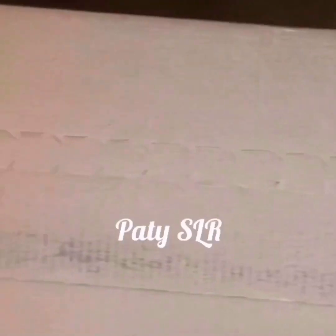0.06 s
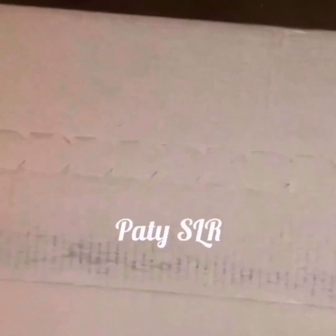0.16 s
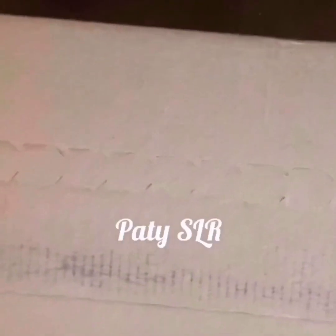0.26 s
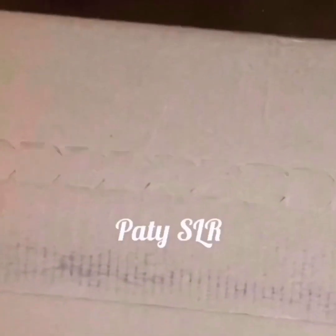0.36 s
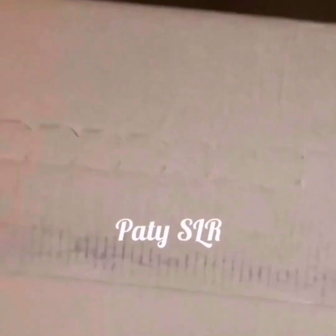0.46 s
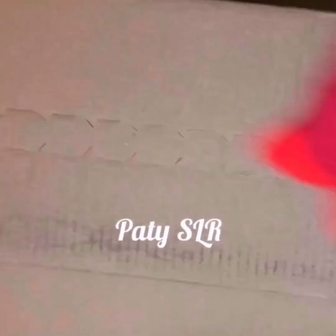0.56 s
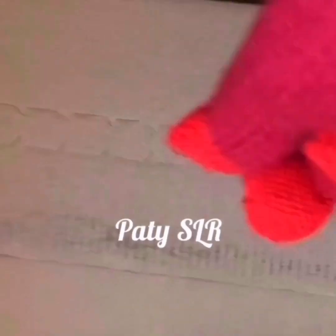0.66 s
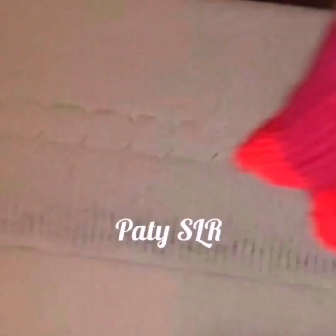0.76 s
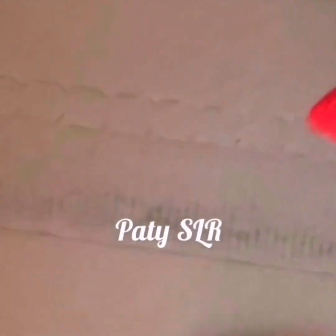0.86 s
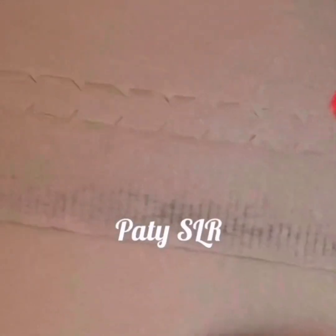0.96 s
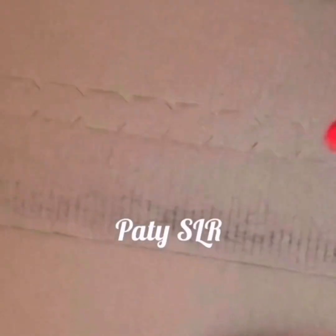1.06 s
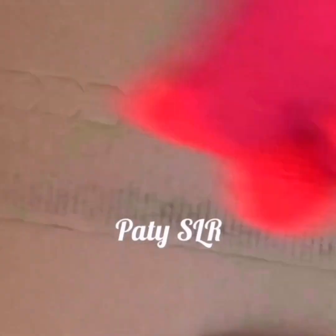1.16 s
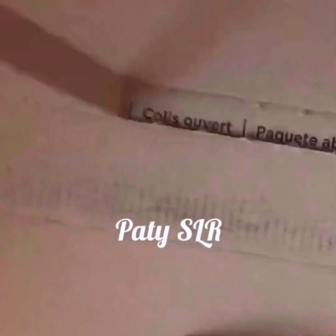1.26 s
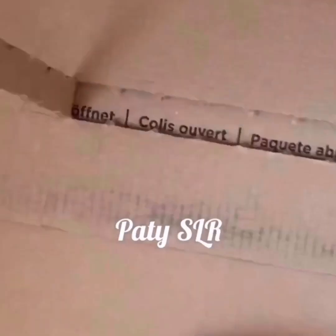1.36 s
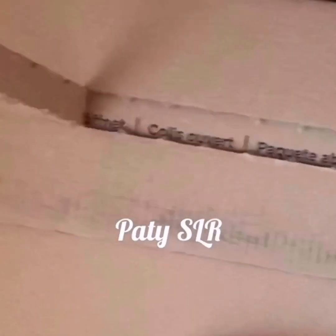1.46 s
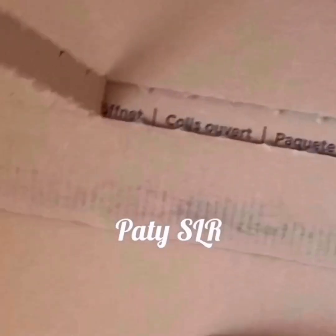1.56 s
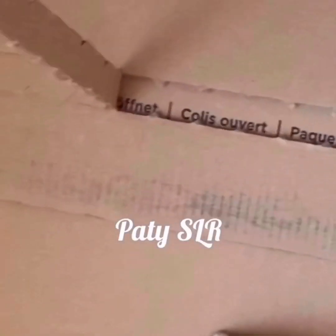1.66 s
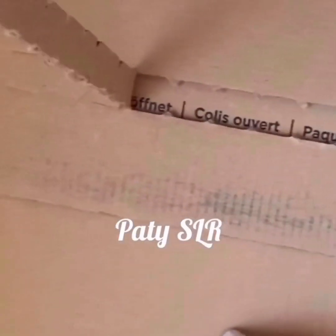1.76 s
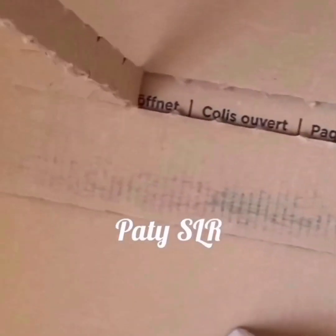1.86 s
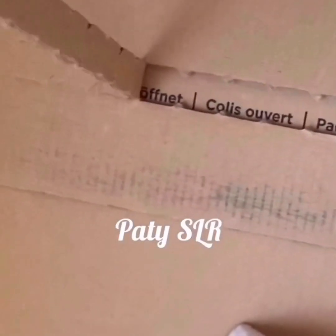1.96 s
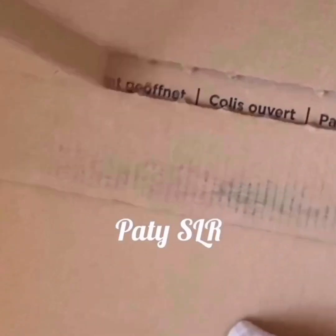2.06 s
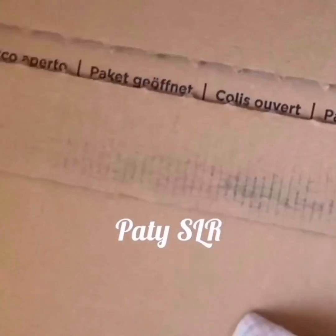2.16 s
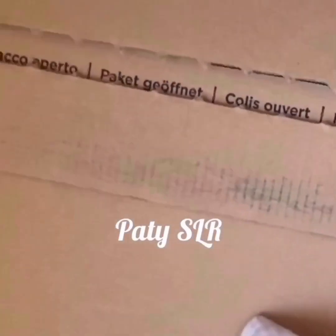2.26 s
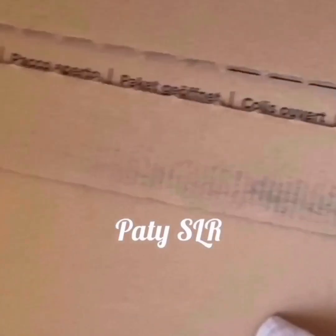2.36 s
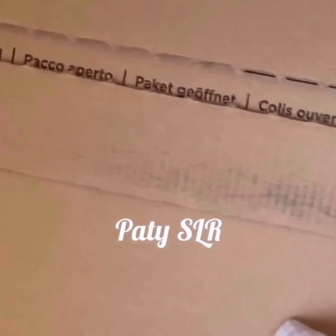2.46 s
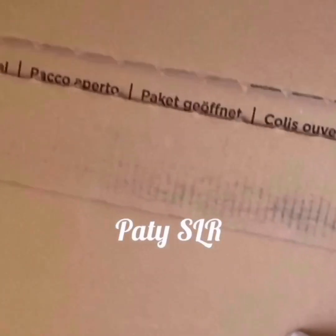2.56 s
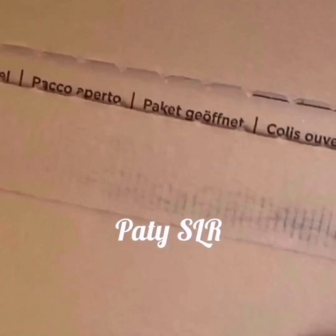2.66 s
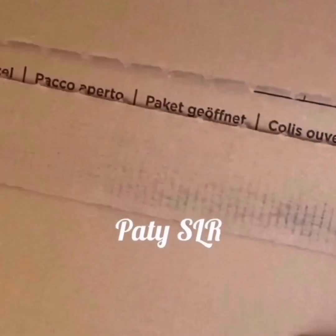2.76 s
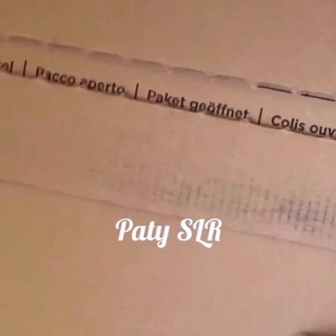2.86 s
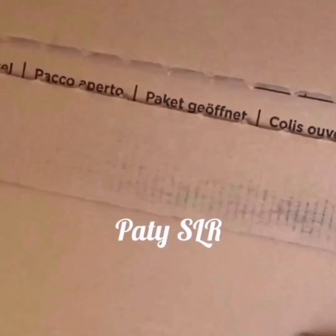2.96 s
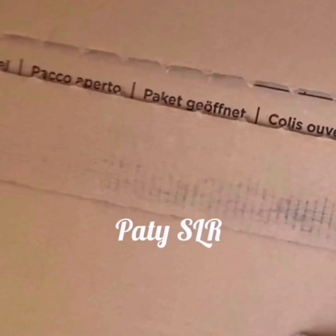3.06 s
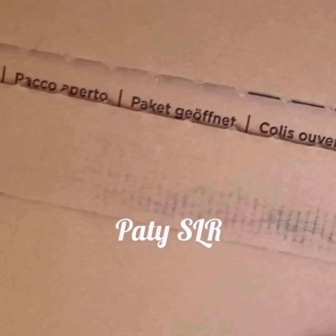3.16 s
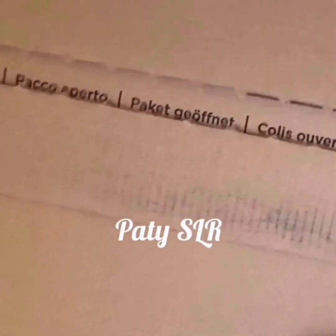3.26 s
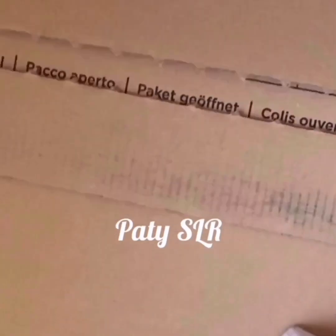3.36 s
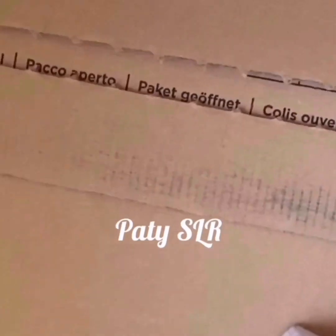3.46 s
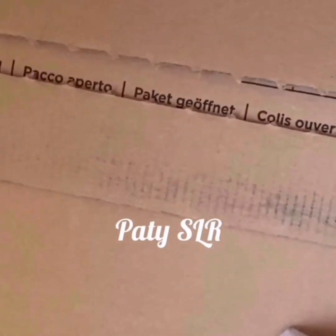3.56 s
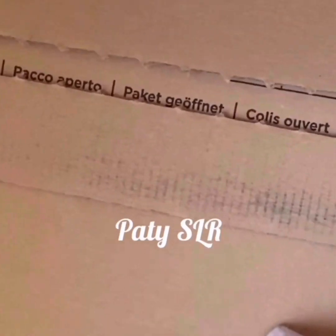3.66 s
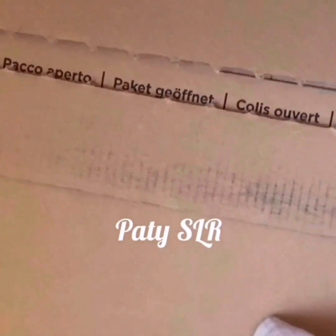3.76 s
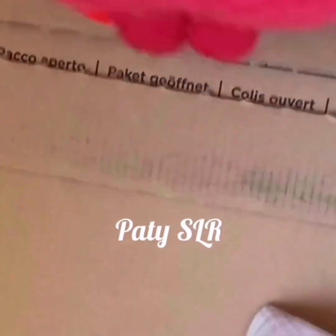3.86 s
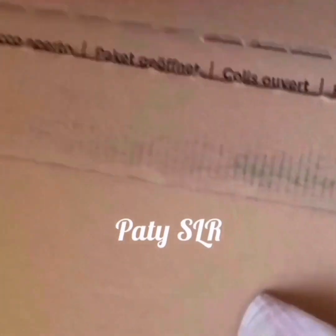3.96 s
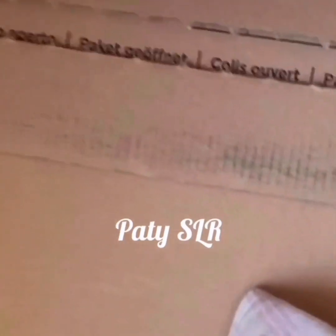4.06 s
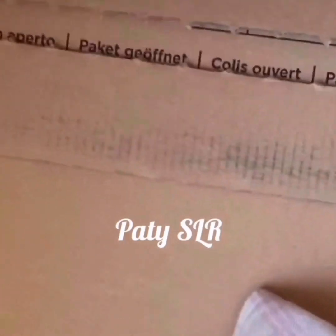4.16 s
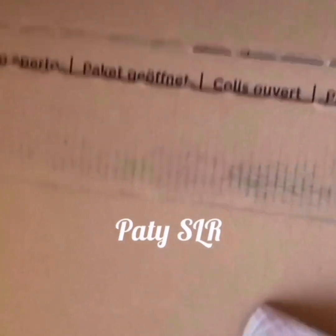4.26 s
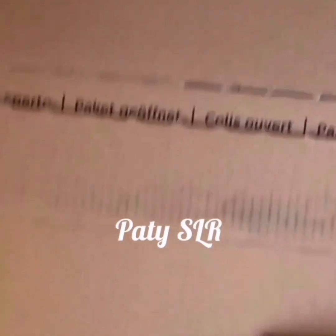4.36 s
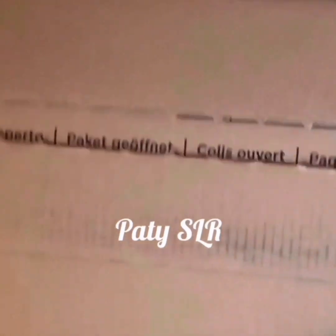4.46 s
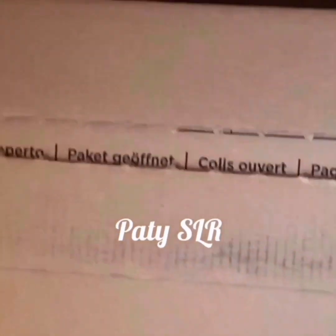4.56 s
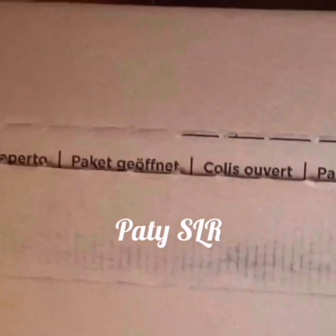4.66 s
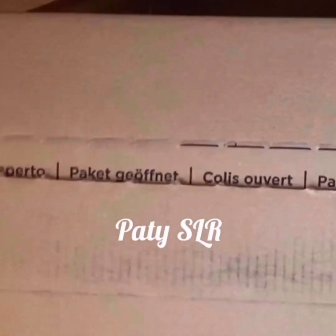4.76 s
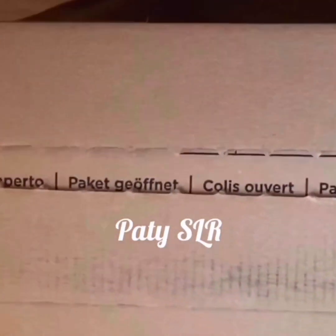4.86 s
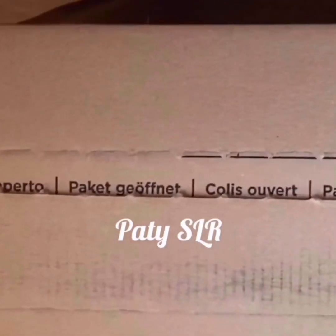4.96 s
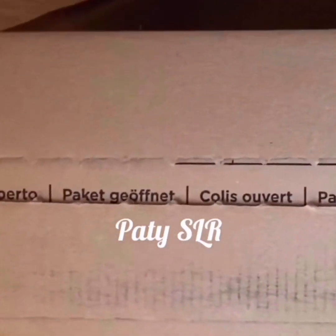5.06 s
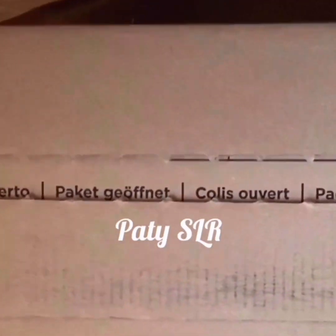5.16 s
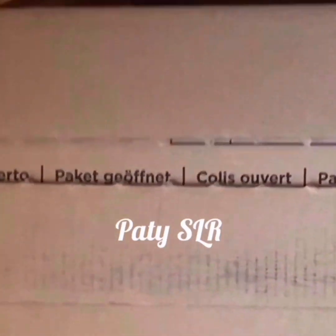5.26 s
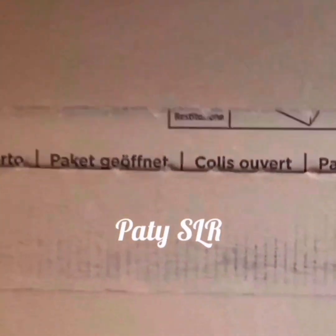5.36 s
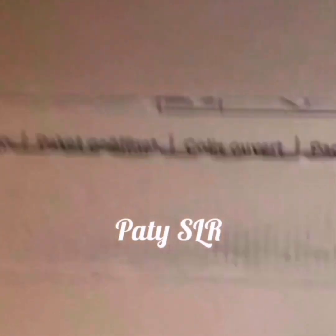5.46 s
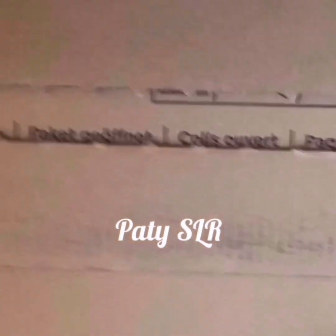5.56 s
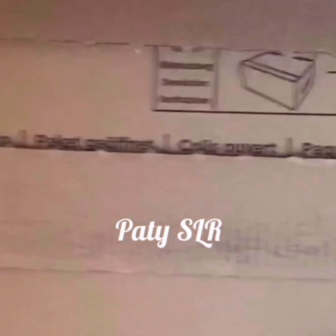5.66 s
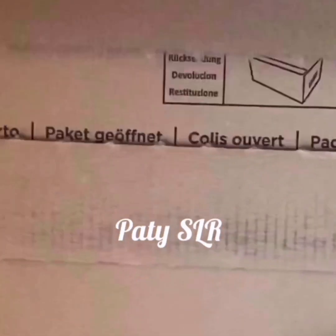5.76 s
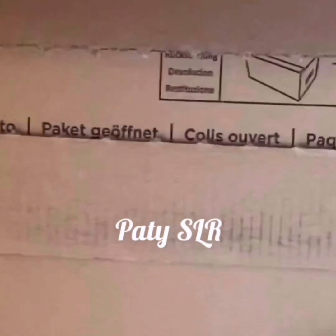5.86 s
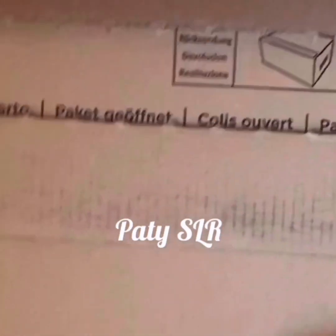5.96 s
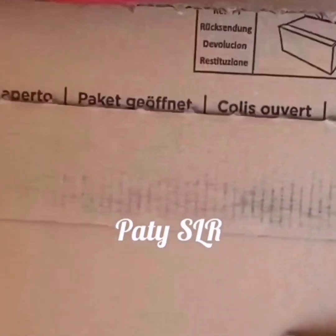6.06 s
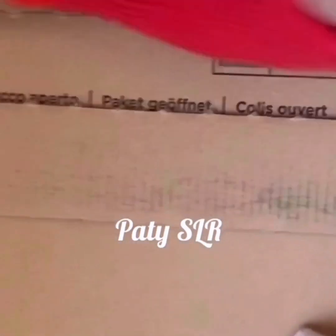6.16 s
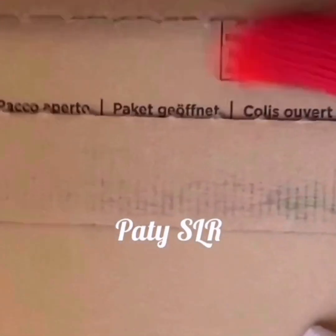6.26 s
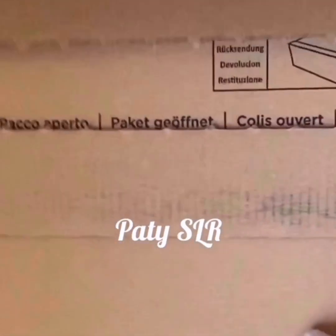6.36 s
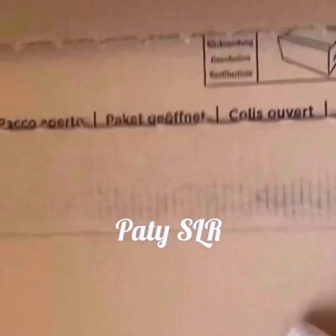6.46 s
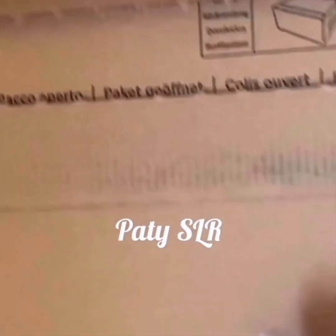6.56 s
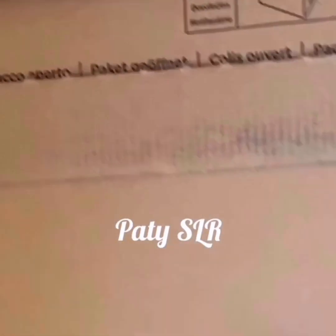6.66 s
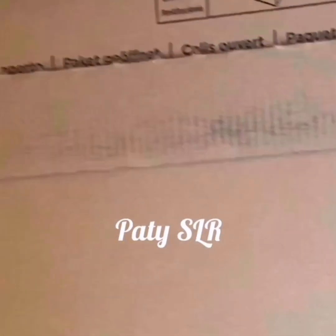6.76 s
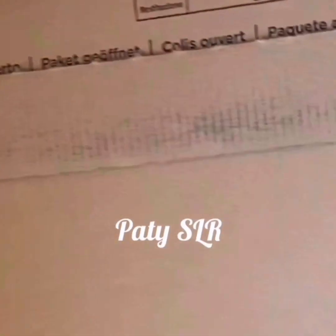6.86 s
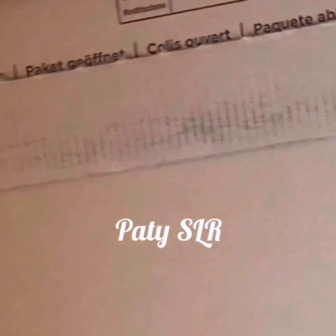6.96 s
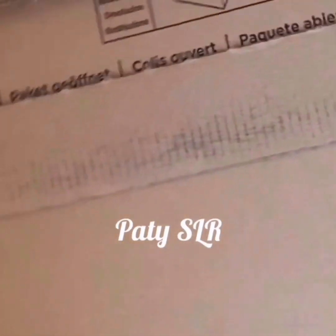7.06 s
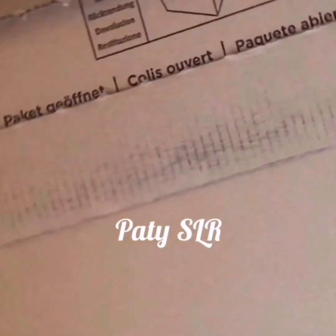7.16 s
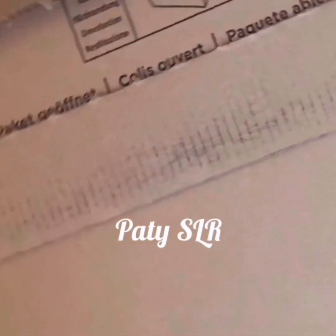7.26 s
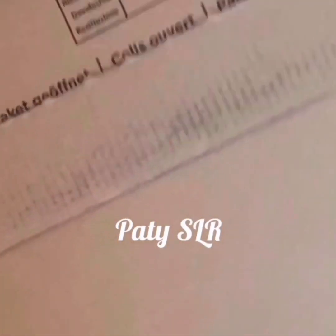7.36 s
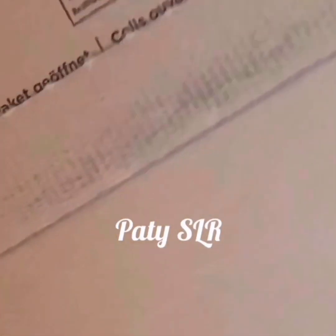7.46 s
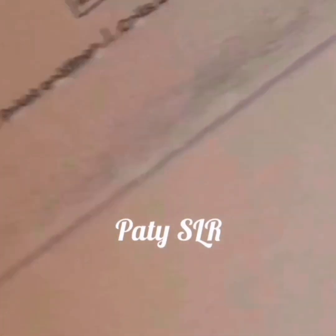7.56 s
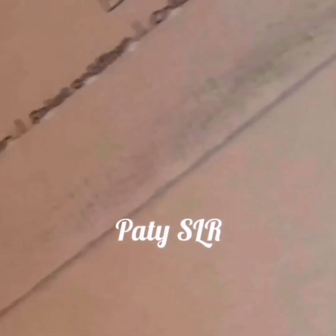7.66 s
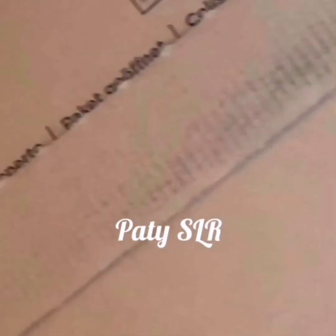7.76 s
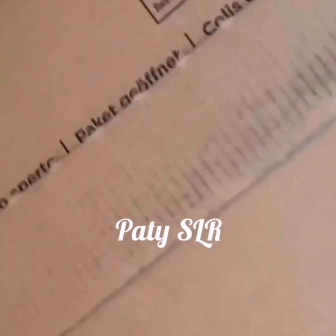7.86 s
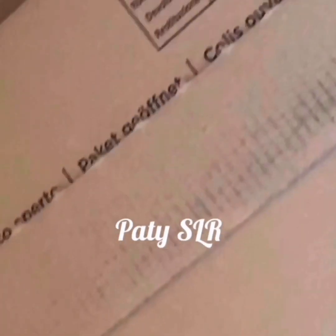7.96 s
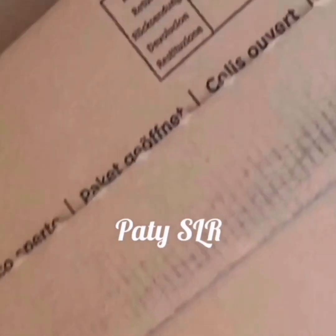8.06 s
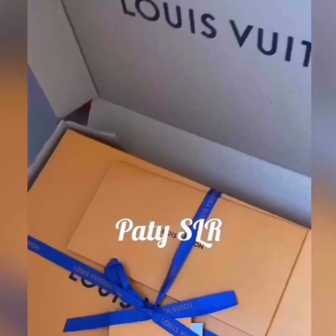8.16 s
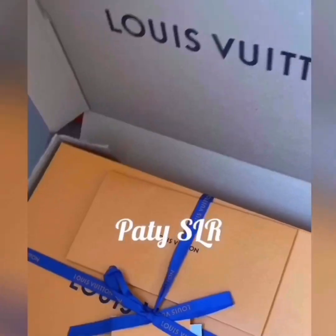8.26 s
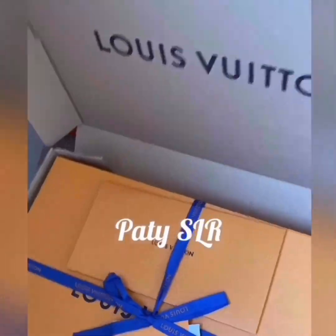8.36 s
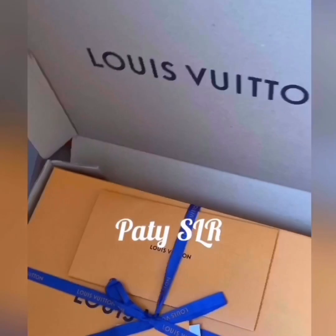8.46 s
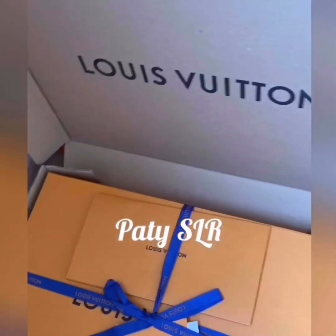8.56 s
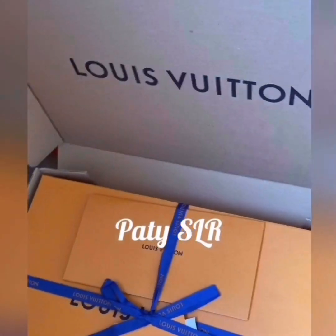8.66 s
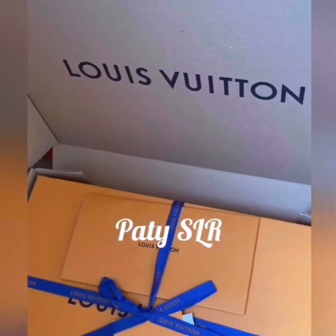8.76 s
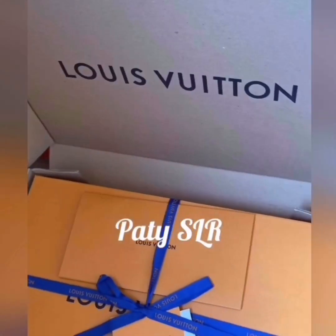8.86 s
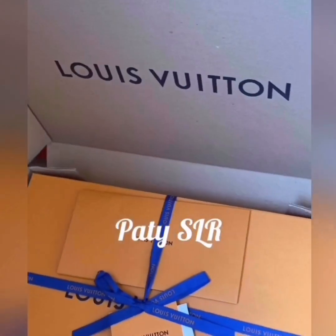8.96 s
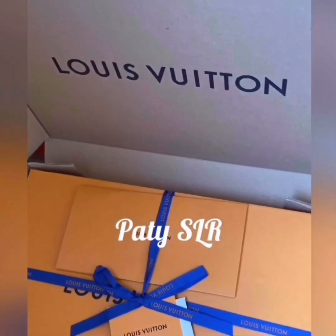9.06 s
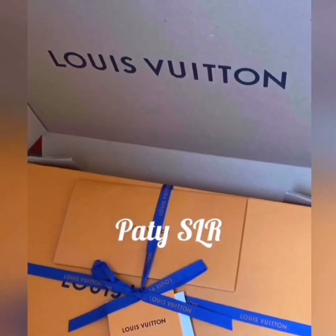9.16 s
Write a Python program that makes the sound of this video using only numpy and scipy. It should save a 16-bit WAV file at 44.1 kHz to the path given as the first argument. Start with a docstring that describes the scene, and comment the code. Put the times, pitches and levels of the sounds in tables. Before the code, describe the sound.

A cardboard tear strip rips open in short, loud, crackling bursts close up, then hands slide and knock softly on the hollow box.

```python
"""Cardboard tear strip

A tear strip is ripped open in short pulls, close to two microphones in a small room. Each pull bursts
a run of paper bridges: clusters of noise cracks that kick the box's decaying modes, while liner peels.
Hands slide over the card as shaped crack noise, a few last bridges give way, creases tick as short
bursts, panels buckle and flaps knock as swept or ringing sines, over a quiet noise rumble."""
import sys
import numpy as np
from scipy import signal
from scipy.fft import rfft, irfft
from scipy.io import wavfile

SR = 44100
rng = np.random.default_rng(int(sys.argv[2]) if len(sys.argv) > 2 else 0)


def log_audio(samples):
    """Write samples as a 16-bit WAV file to the path given in sys.argv[1]."""
    # one column per channel
    frames = np.atleast_2d(samples).T
    # limit to full scale, then quantise
    limited = np.clip(frames, -1, 1)
    pcm = np.round(limited * 32767).astype(np.int16)
    wavfile.write(sys.argv[1], SR, pcm)


N = 405478
TIME = np.arange(N) / SR
BURST_LEAD_S = 2048 / SR  # a burst sits in the middle of its window

# pulls on the strip, each bursting a run of evenly spaced paper bridges:
# start_s, bridge_count, gap_ms, first_level_db, change_per_bridge_db, treble_lift_db, box_kick_db
PULLS = [(0.195, 3, 36.5, -13.5, 1, -3.5, -18.5), (0.290, 4, 22.6, -12.5, -1.02, -4.5, -17),
         (0.8971, 4, 20.5, -11, 1, -0.5, -15), (0.979, 3, 21.3, -14.5, 1, -4.5, -24.5),
         (1.059, 2, 6.5, -18.5, 1, -1.5, -26.5), (1.836, 2, 8.6, -16, 3, -4.5, -25),
         (1.867, 5, 20.5, -10.5, -0.65, -0.5, -17.5), (1.978, 2, 13, -14, -4.5, 2.5, -30.5),
         (2.019, 2, 7, -19, 5.5, -1, -27), (2.362, 2, 21, -16.5, 2, 3.5, -33),
         (2.513, 2, 15.7, -17, 2, 0, -21), (5.063, 3, 4.5, -21, 2, -3.5, -39),
         (5.1315, 1, 20, -21.5, 0, -7, -36), (5.336, 2, 17.5, -28, 7, 3.5, -23.5),
         (5.412, 1, 18, -20, 0, 28, -50)]
# dry ticks: mostly creases as the card bends, plus lone cracks of the strip just before, within or after a
# pull: start_s, level_db, treble_lift_db
CREASES = [(0.083, -46.5, -7.5), (0.170, -24, -0.5), (0.481, -35.5, 18.5), (0.77, -48, 15),
           (0.813, -35, 7.5), (0.872, -27.5, -1), (1.087, -23.5, -10.5), (1.725, -30, 11.5),
           (1.904, -13.5, 6), (2.221, -44.5, -8), (2.302, -50, 9), (2.926, -38, 34), (3.284, -51, 19),
           (4.187, -51.5, -5.5), (4.302, -49, -4), (4.337, -48, 0), (4.372, -46, -5.5), (4.626, -43.5, 7),
           (4.671, -39.5, -9), (4.751, -41.5, -5.5), (4.924, -41, -4), (5.303, -36.5, 6), (5.562, -50, 17),
           (5.646, -44, -8), (5.734, -46.5, -7), (6.021, -36.5, 15), (6.308, -41.5, -15), (6.746, -44, -3),
           (6.894, -52, -5), (7.005, -57.5, -5.5), (7.2, -37, -3.5), (7.438, -43, -4), (7.979, -38.5, -5.5)]
# strokes of hand or card over the box:
# start_s, length_s, grain_hiss_db, panel_scrape_db, swell_db (over the stroke)
STROKES = [(1.687, 0.073, -58, -62.5, 14), (2.424, 0.012, -36, -40.5, 1), (2.876, 0.055, -53, -56.5, 1.5),
           (3.083, 0.16, -63, -60, -5.5), (3.496, 0.1, -75.5, -90, -9), (4.345, 0.17, -65.5, -70, -14.5),
           (4.539, 0.059, -59, -83, 3), (4.743, 0.29, -56.5, -60, 10.5), (5.005, 0.049, -45, -60, 14),
           (5.093, 0.082, -39.5, -44, -11), (5.178, 0.19, -52, -56.5, -10),
           (5.327, 0.25, -49.5, -52.5, -11), (5.563, 0.11, -49.5, -48, -10),
           (5.653, 0.43, -63.5, -64.5, -5.5), (6.154, 0.23, -56.5, -56, 10.5),
           (6.36, 0.3, -59.5, -62, 10.5), (6.721, 0.025, -55, -57, -2.5), (6.867, 0.4, -69.5, -65.5, -0.5),
           (7.218, 0.37, -53.5, -53.5, -3), (7.665, 0.059, -60, -51, -3), (7.776, 0.22, -66, -58, -6.5),
           (8.416, 0.1, -74, -77, -1), (8.801, .38, -71.5, -72.5, 11)]
# a cut edge rasping over the card: start_s, length_s, level_db, resonance_hz
RASPS = [(6.573, 0.11, -55.5, 2340), (6.72, 0.028, -44, 2350), (7.208, 0.28, -53.5, 814),
         (7.518, 0.078, -54, 1060), (7.657, 0.045, -44, 2000), (7.661, 0.051, -46.5, 1065),
         (7.8, 0.05, -56.5, 1100)]
# panels giving way under the pull or a hand: start_s, level_db, pitch_hz
BUCKLES = [(0.898, -15.5, 128.4), (0.912, -18, 203), (0.933, -13, 104.7), (1.003, -15.5, 179.6),
           (1.04, -20.5, 157), (1.086, -25.5, 152), (1.882, -17, 166), (1.901, -15.5, 294),
           (2.385, -24.5, 96), (5.614, -34.5, 98), (6.445, -46, 275), (7.428, -44.5, 105),
           (7.535, -31, 273), (7.66, -33.5, 253), (7.83, -45, 268)]
# flaps and fingers knocking on the box: start_s, level_db, contact_ms, flap_pitch_hz (at the onset)
KNOCKS = [(2.527, -19, 3.3, 341), (3.191, -41, 0.64, 492), (5.332, -29, 0.71, 856),
          (5.353, -17.5, 0.38, 739), (5.409, -23, 0.29, 680), (5.762, -40, 0.79, 630),
          (6.344, -28, 0.06, 560), (7.283, -29.5, 1.3, 435), (7.603, -45, 1.1, 373),
          (8.203, -34.5, 0.75, 330)]
# modes of the hollow box and its panels, before each blow detunes them: pitch_hz, level_db
BOX_MODES = [(45, -15), (74, -7), (101, -2), (128, 0.5), (158, 2.5), (195, -1), (280, 1), (545, 2)]
# a sleeve passing by and jostling the box: time_s, rumble_db
SLEEVE = [(1.24, -68), (1.35, -42.5), (1.52, -50), (1.9, -73), (8.08, -81), (8.15, -56.5), (8.37, -59),
          (8.5, -73.5), (9.03, -76.5), (9.12, -66)]

# spectra, as curves through these points: frequency_hz, level_db
FIBRE_COLOUR = [(100, -20), (350, 1), (650, 2), (1000, 2), (1250, -3), (2000, 2), (4500, 1.5), (10500, -1),
                (16500, -2)]  # tearing bridges
LINER_COLOUR = [(100, -8.5), (240, 12), (400, 2), (1000, 1.5), (1300, -2.5), (16500, -10)]  # peeling paper liner
CREASE_COLOUR = [(100, -17.5), (500, 0), (3800, -1.5), (7000, -2), (16500, -2.5)]  # dry ticks
HISS_COLOUR = [(1200, -18), (3000, 0), (14000, 1), (16500, -7)]  # rubbed paper grain
SCRAPE_COLOUR = [(60, -3), (130, 5), (280, 2), (550, 1), (1300, -14), (5000, -36.5)]  # panels answering a stroke
RASP_COLOUR = [(500, -15.5), (800, -2), (1350, -2.5), (2400, -0.5), (3600, -10), (8000, -20.5)]  # cut edges and scuffs
RUMBLE_COLOUR = [(20, -18.5), (50, 9.5), (100, -3), (800, -62)]  # air booming in the box
AIR_COLOUR = [(20, -13.5), (70, -1.5), (9570, -42), (14000, -38)]  # the room
PORT_COLOUR = [(7000, 0), (8400, -1.5), (11200, 3.5), (12000, -15.5), (13200, 5), (16500, -1.5)]  # microphone port, with a notch and a peak in the top octave


def undb(db):
    """Turn decibels into a gain."""
    return 10 ** (np.asarray(db) / 20)


def unit(x):
    """Scale to an energy of one."""
    return x / np.sqrt(np.sum(x ** 2, axis=-1, keepdims=True))


def convolve(x, response):
    """Play a sound through a response, channel by channel."""
    return signal.fftconvolve(np.atleast_2d(x), np.atleast_2d(response), axes=-1)[:, :N]


def add(track, start_s, sound):
    """Mix a sound into a track."""
    i = max(int(start_s * SR), 0)
    track[..., i:i + sound.shape[-1]] += sound[..., :N - i]


def colour(points, size=4096):
    """Causal (minimum-phase) response of unit energy with the given spectrum."""
    hz, db = np.transpose(points)
    grid = np.maximum(np.fft.rfftfreq(size, 1 / SR), 1)
    cepstrum = irfft(np.log(undb(np.interp(np.log(grid), np.log(hz), db))))
    cepstrum[1:size // 2] *= 2
    cepstrum[size // 2 + 1:] = 0
    return unit(irfft(np.exp(rfft(cepstrum))))


def walk(rate_hz):
    """Random wander: straight lines between draws made at the given rate."""
    steps = rng.standard_normal(N // 100)
    return np.interp(TIME * rate_hz, np.arange(len(steps)), steps)


def cracks(count, spread_db, apart_db=-3):
    """Dense fibre cracks of unequal size, rms one; each reaches the two microphones differently."""
    sizes = undb(spread_db * np.minimum(rng.exponential(size=count), 6))
    pulses = rng.standard_normal(count) + undb(apart_db) * rng.standard_normal((2, count))
    return unit(pulses * sizes) * np.sqrt(count)


def patchy(sound, spread_db, width_octaves=.17):
    """Each spot of card has its own broad resonances, a fraction of an octave wide."""
    steps = np.log2(1 + np.fft.rfftfreq(sound.shape[-1], 1 / SR)) / width_octaves
    db = np.interp(steps, np.arange(256), rng.standard_normal(256))
    return irfft(rfft(sound) * undb(spread_db * db))


def roam(sound, spread_db, size=8192):
    """The resonances change from spot to spot, crossfading between overlapping windows."""
    out, window = np.zeros((2, N)), np.hanning(size)
    padded = np.pad(sound, ((0, 0), (0, size)))
    for i in range(0, N, size // 2):
        add(out, (i + .5) / SR, patchy(padded[:, i:i + size] * window, spread_db))
    return out


def burst(length_ms, lift_db, crackle_db, before_ms, after_ms, spread_db, patchy_db=0,
          clump_db=3, split_hz=4200, size=4096, clump_samples=64):
    """A cluster of cracks, centred in its window; finer crackle leads up to it and trails off."""
    ms = (np.arange(size) - size // 2) / SR * 1000
    age = ms / length_ms + .5
    core = np.clip(4 * age + .5, 0, 1) * np.exp(-age ** 2)  # the first fibres go quickly, the rest follow
    crackle = undb(crackle_db) * np.exp(-np.abs(ms) / np.where(ms < 0, before_ms, after_ms))
    # fibres part in small clumps
    crackle *= undb(rng.standard_normal(size // clump_samples).repeat(clump_samples) * clump_db)
    sound = patchy(cracks(size, spread_db), patchy_db) * (core + crackle)
    hz = np.fft.rfftfreq(size, 1 / SR)
    treble = hz ** 4 / (hz ** 4 + split_hz ** 4)
    lifted = irfft(rfft(sound) * undb(lift_db * treble))
    return unit(lifted) * np.sqrt(length_ms * SR / 1000)


def bridges(trailing_db=-16):
    """Rows of start_s, level_db, treble_lift_db, box_kick_db: a steady pull meets perforations evenly."""
    rows = []
    for start, count, gap_ms, db, change_db, treble_db, kick_db in PULLS:
        for k in range(count + 1):
            step_db = change_db * min(k, count - 1)
            if k == count:  # the slackening strip parts one more bridge, weakly
                step_db += trailing_db
            rows.append((start + k * gap_ms / 1000, db + step_db, treble_db, kick_db + step_db))
    return rows


def tearing(length_ms=5.5, crackle_db=-13, before_ms=4, after_ms=13, spread_db=3, patchy_db=3):
    """Fibres creak under strain, then a whole bridge lets go."""
    track = np.zeros((2, N))
    for s, db, treble_db, _ in bridges():
        stretched_ms = length_ms * rng.uniform(.75, 1.25)
        sound = burst(stretched_ms, treble_db, crackle_db, before_ms, after_ms, spread_db, patchy_db)
        add(track, s - BURST_LEAD_S, undb(db) * sound)
    return convolve(track, colour(FIBRE_COLOUR))


def peeling(peel_db=-17.0, edge_s=0.0059, clump_db=5, grain_db=4.0):
    """Between the bridges the paper liner peels away in ragged clumps, as long as the pull lasts."""
    effort = np.zeros(N)
    for start, count, gap_ms, db, *_ in PULLS:
        end = start + (count - 1) * gap_ms / 1000
        outside_s = np.maximum(start - TIME, 0) + np.maximum(TIME - end, 0)
        effort = np.maximum(effort, undb(db) * np.exp(-outside_s / edge_s))
    fibres = cracks(N, grain_db) * effort * undb(peel_db + clump_db * walk(300))
    return roam(convolve(fibres, colour(LINER_COLOUR)), spread_db=3.0, size=2048)


def ringing(gain_db=-12, panel_hz=580, t60_s=.07, apart_hz=800, size=8192):
    """The panel beside the tear rings briefly at each bridge, on a note that varies at random."""
    track, t = np.zeros((2, N)), np.arange(size) / SR
    for s, db, *_ in bridges():
        hz = panel_hz * rng.uniform(.88, 1.14)
        skew = np.tanh(hz / apart_hz) * np.array([[1], [-1]])
        envelope = (1 - np.exp(-2 * hz * t)) * np.exp(-np.log(1000) * t / t60_s)
        add(track, s, undb(db + gain_db) * envelope * np.sin(2 * np.pi * hz * t + skew))
    return track


def box_ring(bend_s=.05, apart_hz=1300, ring_cycles=24):
    """Box response: low bending waves arrive late, high modes meet the microphones out of step."""
    t = np.arange(SR) / SR
    ring = 0
    for k, (hz, db) in enumerate(BOX_MODES):
        age = np.maximum(t - bend_s / np.sqrt(hz), 0)
        skew = (-1) ** k * hz / apart_hz * np.array([[1], [-1]])
        attack = 1 - np.exp(-2 * np.pi * hz * age)
        decay = np.exp(-np.log(1000) * age * hz / ring_cycles)  # down 60 dB after ring_cycles
        ring = ring + undb(db) * attack * decay * np.sin(2 * np.pi * hz * age + skew + np.pi / 4)
    return ring


def push(contact_ms, size=1024):
    """A soft blow of unit area: the longer the contact, the duller."""
    ms = np.arange(size) / SR * 1000
    force = ms * np.exp(-2 * np.pi * ms / contact_ms)
    return force / force.sum()


def thumping(kick_db=-5, kick_ms=2.1, knock_db=-8, graze_db=11, graze_ms=0.16):
    """Bursting bridges spring the lid back and knocks strike the same box, detuned afresh each blow."""
    track, ring, i = np.zeros((2, N)), box_ring(), np.arange(SR // 2)
    blows = [(s - .002, db + kick_db, kick_ms) for s, _, _, db in bridges()]
    for s, db, ms, _ in KNOCKS:
        lost_db = graze_db / (1 + (ms / graze_ms) ** 2)  # a brief tap hardly moves the box
        blows.append((s, db + knock_db - lost_db, ms))
    for s, db, ms in blows:
        tuning = rng.uniform(.9, 1.12)
        bent = [np.interp(i * tuning, np.arange(SR), side) for side in ring]
        add(track, s, undb(db) * convolve(bent, push(ms)))
    return track


def buckling(swell_cycles=1.7, uneven_db=2, size=8192):
    """A panel gives way: a ragged thud of a few cycles."""
    track, t = np.zeros(N), np.arange(size) / SR
    for s, db, hz in BUCKLES:
        age = hz * t / swell_cycles
        phase = 2 * np.pi * hz * t + .5 * walk(hz)[:size]
        level = undb(db + uneven_db * walk(hz)[:size])
        add(track, s, level * age * np.exp(1 - age) * np.sin(phase))
    return track


def creasing(length_ms=4.3, crackle_db=-18, before_ms=2.0, after_ms=10, spread_db=3):
    """Short dry ticks of bending card, and lone cracks of the strip around the pulls."""
    track = np.zeros((2, N))
    for s, db, treble_db in CREASES:
        tick = burst(length_ms, treble_db, crackle_db, before_ms, after_ms, spread_db)
        add(track, s - BURST_LEAD_S, undb(db) * tick)
    return convolve(track, colour(CREASE_COLOUR))


def rubbing(attack_s=0.015, release_s=0.0066, strain_hiss_db=-23, strain_scrape_db=-33.5, strain_rise_s=0.023):
    """Gains of hiss and scrape: strokes start quickly, swell or fade; strain builds before each pull."""
    t = TIME[::64]
    power = np.zeros((2, len(t)))
    for start, length, hiss_db, scrape_db, swell_db in STROKES:
        before, after = np.minimum(t - start, 0), np.maximum(t - start - length, 0)
        gate = np.exp(before / attack_s - after / release_s)
        swell = undb(swell_db * (np.clip((t - start) / length, 0, 1) - .5))
        power += np.outer(undb([hiss_db, scrape_db]), gate * swell) ** 2
    for start, _, _, db, *_ in PULLS:  # a creak as the pull takes up the slack
        strain = np.exp(np.minimum(t - start, 0) / strain_rise_s) * (t < start)
        power += np.outer(undb([db + strain_hiss_db, db + strain_scrape_db]), strain) ** 2
    return [np.interp(TIME, t, gain) for gain in np.sqrt(power)]


def sliding(panel_db=-1, rasp_db=-8, catch_db=1.5, snag_db=2.0, grain_db=2.0):
    """Skin and card catch and slip on the paper grain; the panels and cut edges answer."""
    snags = np.clip(walk(260), 0, 2) ** 2  # now and then a single fibre snags and lets go
    catch = undb(catch_db * walk(70) + snag_db * snags)
    hiss, scrape = catch * rubbing()
    grain = convolve(cracks(N, grain_db) * hiss, colour(HISS_COLOUR))
    panel = convolve(cracks(N, grain_db, apart_db=-4) * scrape, colour(SCRAPE_COLOUR))
    rasp = convolve(cracks(N, grain_db) * scrape, colour(RASP_COLOUR))
    answer = undb(panel_db) * panel + undb(rasp_db) * rasp
    return roam(grain, spread_db=4.5) + roam(answer, spread_db=6.5)


def crinkling(crinkle_db=-7, per_s=70, spread_db=2, decay_ms=1.0, size=512):
    """Rubbed card also gives off separate small ticks, louder where the rubbing hisses louder."""
    struck = rng.random(N) < per_s / SR
    ticks = struck * cracks(N, spread_db) * np.sqrt(SR / per_s) * rubbing()[0]
    crunch = unit(rng.standard_normal(size) * np.exp(-np.arange(size) / SR * 1000 / decay_ms))
    return undb(crinkle_db) * convolve(convolve(ticks, crunch), colour(CREASE_COLOUR))


def rasping(edge_s=0.0059, slips_per_s=450, slip_db=3, rough_db=3.5, skirt_db=-16, size=16384):
    """A cut edge catches and slips over the flutes, ringing the free end of the flap."""
    track, t = np.zeros((2, N)), np.arange(size) / SR - BURST_LEAD_S
    for start, length, db, hz in RASPS:
        gate = np.exp((np.minimum(t, 0) - np.maximum(t - length, 0)) / edge_s)
        slips = undb(slip_db * walk(slips_per_s) + rough_db * walk(71.3))[:size]
        slips /= np.sqrt(np.mean(slips ** 2))
        flap = colour([(hz / 4, 2 * skirt_db), (hz / 1.4, skirt_db), (hz, 0),
                       (hz * 1.4, skirt_db), (hz * 4, 2 * skirt_db), (hz * 8, 3 * skirt_db)])
        rasp = convolve(cracks(size, spread_db=0.0) * gate * slips, flap)
        add(track, start - BURST_LEAD_S, undb(db) * rasp)
    return track


def flexing(flex_db=-1, fall_ms=14, swell_cycles=2.94, buckle_db=3.5, size=4096):
    """A knocked flap gives a rough, hollow pop, falling in pitch as slower bending waves arrive."""
    track = np.zeros(N)
    ms = np.arange(size) / SR * 1000
    for s, db, _, start_hz in KNOCKS:
        hz = start_hz / (1 + ms / fall_ms)
        age = start_hz * ms / 1000 / swell_cycles
        phase = 2 * np.pi * np.cumsum(hz) / SR + .9 * walk(start_hz)[:size]
        pop = np.sin(phase) * age * np.exp(1 - age)
        pop *= undb(buckle_db * walk(2 * start_hz))[:size]  # the flutes buckle unevenly
        add(track, s, undb(db + flex_db) * pop)
    return track


def scuffing(scuff_db=-6.5, decay_ms=7, size=2048):
    """A knock crushes the surface for a moment: the shorter the contact, the louder the scuff."""
    track = np.zeros((2, N))
    fade = np.exp(-np.arange(size) / SR * 1000 / decay_ms)
    for s, db, ms, _ in KNOCKS:
        level = undb(db + scuff_db) / (1 + ms ** 2)
        add(track, s, level * fade * cracks(size, spread_db=-13.5))
    return convolve(track, colour(RASP_COLOUR))


def rumbling(drag_db=-6):
    """The air in the box booms softly when it is jostled or dragged."""
    time_s, rumble_db = np.transpose(SLEEVE)
    jostle = undb(np.interp(TIME, time_s, rumble_db))
    shake = jostle + undb(drag_db) * rubbing()[1]
    return convolve(rng.standard_normal(N) * shake, colour(RUMBLE_COLOUR))


def ports(x, apart_hz=8000):
    """Long waves reach both microphones alike; short ones arrive out of step."""
    hz = np.fft.rfftfreq(N, 1 / SR)
    turn = np.exp(1j * np.pi / 4 * np.tanh((hz / apart_hz) ** 2))
    return irfft(rfft(x) * np.array([turn, turn.conj()]), N)


def room(x, wet_db=-15, build_s=0.0056, alike_hz=500, t60_s=0.27):
    """Diffuse tail of a small furnished room: decaying noise that builds up quickly."""
    t = np.arange(SR) / SR
    noise = rng.standard_normal((2, SR))
    lowpass = signal.butter(2, alike_hz, fs=SR, output="sos")
    noise[1] += signal.sosfilt(lowpass, noise[0] - noise[1])  # long waves reach both microphones alike
    tail = noise * np.exp(-np.log(1000) * t / t60_s)
    return undb(wet_db) * convolve(x, unit(tail * (1 - np.exp(-t / build_s))))


def air(gain_db=-74.5):
    """Quiet room rumble: noise common to both microphones plus as much of each one's own."""
    noise = rng.standard_normal(N) + rng.standard_normal((2, N))
    return undb(gain_db) * convolve(noise, colour(AIR_COLOUR))


def scene(balance_db=0.86):
    """Everything happens on the box, just in front of the microphones, with the room around it."""
    tear = tearing() + peeling() + ringing() + thumping() + buckling()
    handling = creasing() + sliding() + crinkling() + rasping()
    knocks = flexing() + scuffing()
    card = ports(tear + handling + knocks + rumbling())
    balance = undb(np.array([[balance_db], [-balance_db]]) / 2)
    return (card + room(card)) * balance + air()


def record(dry, low_cut_hz=33, top_hz=15900):
    """The microphones colour the treble and drop the deepest bass; peaks round off, the top is cut."""
    low_cut = signal.butter(2, low_cut_hz, "high", fs=SR, output="sos")
    top_cut = signal.ellip(12, .2, 90, top_hz, fs=SR, output="sos")
    sound = signal.sosfilt(low_cut, convolve(dry, colour(PORT_COLOUR)))
    return signal.sosfilt(top_cut, np.tanh(sound))


dry = scene()
out = record(dry)
log_audio(out)
```